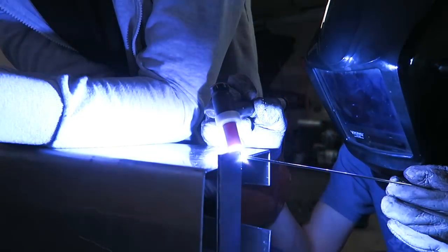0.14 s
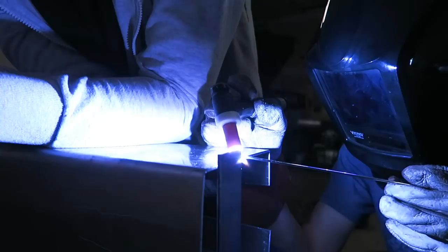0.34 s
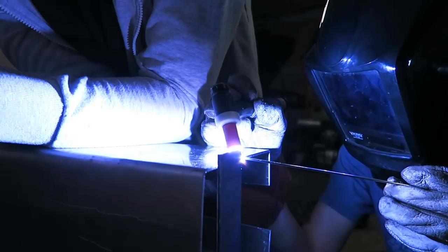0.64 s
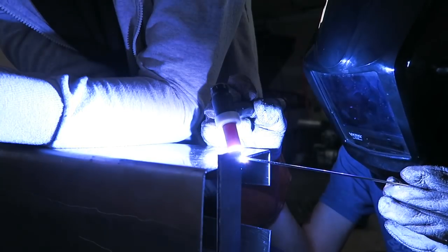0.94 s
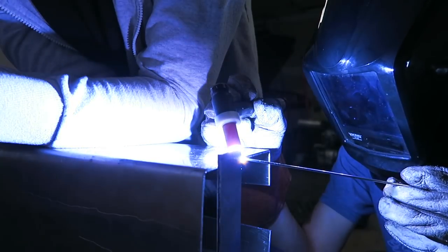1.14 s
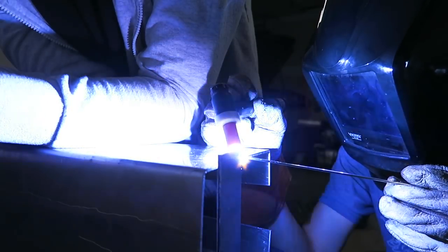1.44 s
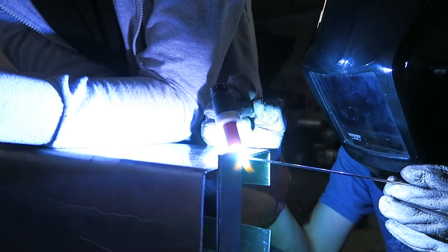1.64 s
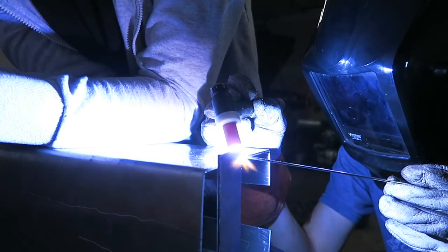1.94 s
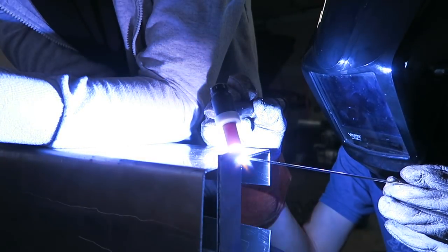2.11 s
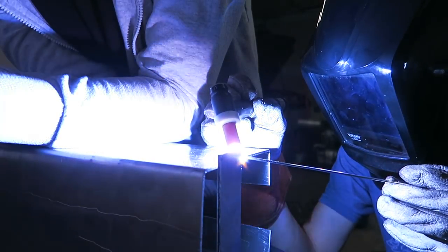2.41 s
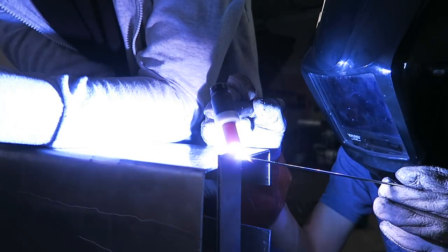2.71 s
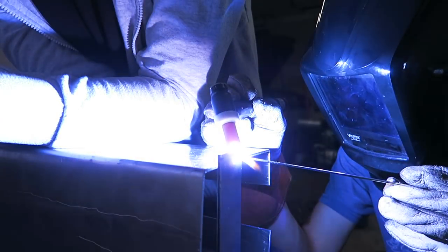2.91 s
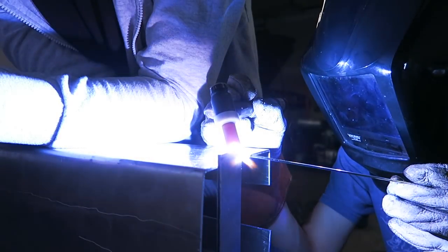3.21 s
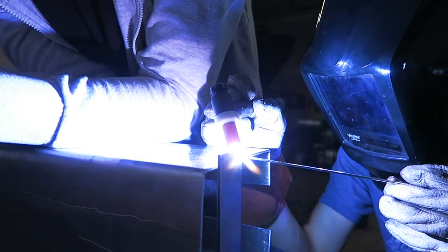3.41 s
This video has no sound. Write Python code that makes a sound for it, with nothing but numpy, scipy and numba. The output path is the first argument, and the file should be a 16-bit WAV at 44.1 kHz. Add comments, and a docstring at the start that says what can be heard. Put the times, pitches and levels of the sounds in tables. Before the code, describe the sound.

A welding arc buzzes on metal close to a stereo microphone, nasal for an instant, then brighter and fuller, with constant sizzle, uneven snaps and clusters of low pops from about one second.

```python
"""An AC TIG arc buzzes on metal close to a stereo microphone for about three and a half seconds.
It opens nasal, with one strike per current cycle; after 0.115 s there are two, one per polarity, and torch and
workpiece ring with every strike. Noise gated by the strikes sizzles, and uneven strikes snap in the upper middle.
Small pops flurry around larger ones, which begin at 0.4 s: at arc misfires low pops, probably electrical
interference in the microphone, differ left and right; from 2.53 s they lose their bass.
The recorder's gain control ducks on the loudest peaks and creeps back."""
import sys
import numpy as np
from scipy import signal
from scipy.fft import rfft, irfft, next_fast_len
from scipy.io import wavfile
from scipy.ndimage import uniform_filter1d
from numba import njit

SR = 44100
rng = np.random.default_rng(int(sys.argv[2]) if len(sys.argv) > 2 else 0)


def persist_wave(psi):
    """Save psi, clipped to +-1, as 16-bit WAV."""
    counts = np.round(np.clip(psi, -1, 1) * 32767).astype(np.int16)
    wavfile.write(sys.argv[1], SR, np.atleast_2d(counts).T)


N = 156555  # samples

ARC_HZ, FIRST_STRIKE_S = 130.062, .00145
REVERSAL_S = .002397  # from the first strike of a cycle to the second
JITTER_S = 2.5e-6  # typical timing error of a strike
TOP_HZ = 15600


def undb(db):
    """Turn dB into an amplitude factor."""
    return 10 ** (np.asarray(db) / 20)


def unit(x):
    """Scale to rms 1."""
    return x / np.sqrt(np.mean(x ** 2))


def clock():
    """Time of every sample in seconds."""
    return np.arange(N) / SR


def curve(table, axis=1):
    """Gain over time from a dB column, straight in dB between the rows."""
    table = np.array(table, float)
    return undb(np.interp(clock(), table[:, 0], table[:, axis]))


def colour(x, points, size=4096):
    """Causal minimum-phase filter through (Hz, dB) points."""
    hz, db = np.array(sorted(map(tuple, points)), float).T
    f = np.maximum(np.fft.rfftfreq(size, 1 / SR), 1)
    log_gain = np.log(undb(np.interp(np.log(f), np.log(hz), db)))
    # folding the cepstrum onto positive time makes the response causal
    cepstrum = irfft(log_gain)
    cepstrum[1:size // 2] *= 2
    cepstrum[size // 2 + 1:] = 0
    response = irfft(np.exp(rfft(cepstrum)))
    return signal.fftconvolve(x, response)[:N]


def clicks(times, sizes, count=8):
    """Band-limited clicks placed between samples, each a windowed sinc."""
    at = times[:, None] * SR
    index = np.floor(at).astype(int) + np.arange(1 - count, count + 1)
    window = np.cos(np.pi * (index - at) / (2 * count)) ** 2
    taps = sizes[:, None] * np.sinc(index - at) * window
    inside = (index >= 0) & (index < N)
    return np.bincount(index[inside], taps[inside], N)


def cycle_starts():
    """Time of the first strike in every current cycle."""
    return FIRST_STRIKE_S + np.arange(int(N / SR * ARC_HZ)) / ARC_HZ


def strikes(delay, scatter_db):
    """One click per current cycle, uneven in level and slightly in time."""
    starts = cycle_starts()
    chance = np.clip(rng.standard_normal((len(starts), 2)).T, -2, 2)
    return clicks(starts + delay + JITTER_S * chance[0], undb(scatter_db * chance[1]))


def stereo(centre, side):
    """Left and right from the centre and side signals."""
    return np.array([centre + side, centre - side])


# Ring of arc, torch and workpiece. Each row: frequency in Hz, relative level in dB of the first strike
# on cold metal, of the first strike on hot metal, and of the second strike.
RING = [(174, -17.5, 5, 3), (405, -6.5, 7.5, -9.5), (704, -5.5, 10.5, 12), (912, -11, -4.5, -16.5),
        (1184, 9.5, 7.5, 5.5), (1608, 0, 14.5, 14.5), (1990, -2, -9.5, 4.5), (2210, 3.5, 16, -12),
        (2565, -36, -7.5, -9.5), (2716, -42, 23, 19.5), (3053, 22.5, 17, 23), (3520, 19, -3.5, 15),
        (4500, 7.5, 5.5, -9.5), (4770, -1, -12, -3), (6400, -7.5, -32, -7.5), (7010, 8, 10.5, 5),
        (7290, -11, -4.5, -20.5), (9140, -4, -21, -13), (9880, -3, 6, 8), (10930, -6.5, 13.5, 6.5),
        (11400, 5.5, -2.5, -1), (11500, -13, -23, -12), (12500, 7, -6, -11), (12900, -8, -24, -20),
        (13140, 4.5, -2, 7), (15900, -4.5, -20, -28)]
# Nasal tint before the arc settles. Each row: frequency in Hz, gain in dB.
UNSETTLED = [(300, -6), (620, 11.5), (1200, -9), (1750, 13.5), (3000, -4.5), (3800, -1)]
HEATS_S, SETTLES_S = (0.13, 2.8), .115  # span of the cold-to-hot fade; end of the nasal start
SCATTER_DB = 1
SPREAD_HZ, SPREAD_WIDTH_HZ = 2490, 1000


def ring_of_metal():
    """The first strike's ring changes colour as the metal heats; the second joins once the arc settles."""
    table, t = np.array(RING), clock()
    click = strikes(0, SCATTER_DB)
    cold = colour(click, table[:, [0, 1]])
    hot = colour(click, table[:, [0, 2]])
    second = colour(strikes(REVERSAL_S, SCATTER_DB), table[:, [0, 3]])
    heat = np.interp(t, HEATS_S, [0, 1])
    settled = (1 - heat) * cold + heat * hot + second
    ring = np.where(t < SETTLES_S, colour(cold, UNSETTLED), settled)
    # an all-pass resonance spreads the ring in time around SPREAD_HZ
    radius = np.exp(-np.pi * SPREAD_WIDTH_HZ / SR)
    poles = np.array([1, -2 * radius * np.cos(2 * np.pi * SPREAD_HZ / SR), radius ** 2])
    return signal.lfilter(poles[::-1], poles, ring)


# Borders in Hz between the buzz's hum, middle, presence and treble.
BAND_EDGES_HZ = [455, 2450, 4600]
# The buzz as the arc builds. Each row: time in seconds, then the level in dB, before the trim BUZZ_DB,
# of hum, middle, presence and treble.
BUZZ = [(0, -36, -19, -24.5, -23), (.1, -39, -19.5, -32, -22.5), (.13, -41, -21.5, -22, -22),
        (.3, -39.5, -18.5, -18, -21.5), (.72, -41, -19.5, -15.5, -23.5), (.9, -33.5, -15, -12, -19.5),
        (1.43, -29, -17.5, -15.5, -18.5), (1.57, -33.5, -21, -17, -23), (1.9, -29.5, -15, -13.5, -16.5),
        (2.55, -24.5, -15.5, -14, -18), (3.15, -24.5, -17, -16, -20.5), (3.53, -28, -20, -17.5, -22)]
BUZZ_DB = -4.5
# Stereo width of the buzz. Each row: frequency in Hz, side against centre in dB.
BUZZ_WIDTH = [(300, -27), (900, -15), (3200, -25.5), (4500, -20), (11000, -15.5)]


def buzz():
    """Strikes repeating at the current's rate ring into a buzz; each register swells in its own way."""
    ring = ring_of_metal()
    edges = [ARC_HZ / 2] + list(BAND_EDGES_HZ) + [TOP_HZ]
    centre = 0
    for k, band_hz in enumerate(zip(edges, edges[1:])):
        sections = signal.butter(8, band_hz, "band", fs=SR, output="sos")
        band = signal.sosfiltfilt(sections, ring)
        # even out the level over ten cycles, so the table alone sets it
        band = band / np.sqrt(uniform_filter1d(band ** 2, int(10 * SR / ARC_HZ)))
        centre = centre + undb(BUZZ_DB) * band * curve(BUZZ, axis=k + 1)
    quarter_turn = signal.hilbert(centre, next_fast_len(N))[:N].imag
    return stereo(centre, colour(quarter_turn, BUZZ_WIDTH))


# Course of the sizzle, which snaps and small pops follow too. Each row: time in seconds, relative level in dB.
SIZZLE = [(0, -31), (.13, -29), (.22, -34), (.39, -26), (.485, -30.5), (.565, -24.5), (.73, -32), (.9, -25),
          (1.5, -27.5), (1.59, -32), (1.8, -23), (2.02, -25.5), (2.5, -27.5), (2.85, -27.5), (3.53, -29)]
# Colour of the sizzle and of the pops' clicks. Each row: frequency in Hz, gain in dB.
SIZZLE_COLOUR = [(40, -26), (260, -8), (910, -11), (2100, -3), (3600, -5), (5100, -12.5), (12000, -8),
                 (15600, -29)]
# Stereo width of the sizzle. Each row: frequency in Hz, side against centre in dB.
SIZZLE_WIDTH = [(300, 8), (700, 5), (1500, -6.5), (4000, -9), (8000, 0.5)]
SIZZLE_DB, SIZZLE_SCATTER_DB, SIZZLE_DECAY_S = 3, 7.5, 0.00091
SIZZLE_SECOND, SIZZLE_BETWEEN = 0.69, 1  # second strike and constant hiss, against the first strike


def sizzle():
    """A short spit of noise decays after each strike, over a constant hiss."""
    age = np.arange(int(SR / ARC_HZ)) / SR
    first = strikes(0, SIZZLE_SCATTER_DB)
    second = SIZZLE_SECOND * strikes(REVERSAL_S, SIZZLE_SCATTER_DB)
    spits = signal.fftconvolve(first + second, np.exp(-age / SIZZLE_DECAY_S))[:N]
    gate = SIZZLE_BETWEEN + spits
    centre, side = (unit(colour(gate * rng.standard_normal(N), SIZZLE_COLOUR)) for _ in range(2))
    return undb(SIZZLE_DB) * curve(SIZZLE) * stereo(centre, colour(side, SIZZLE_WIDTH))


SNAP_HZ, SNAP_DB, SNAP_SCATTER_DB = 3500, -4, 4.5  # lower band edge; level against the sizzle's course


def snaps():
    """Hard re-ignitions, one per cycle, snap unevenly in a narrow band of the upper middle."""
    band = signal.butter(2, [SNAP_HZ, SNAP_HZ * 1.151], "band", fs=SR, output="sos")
    ringing = signal.sosfilt(band, strikes(0, SNAP_SCATTER_DB))
    return undb(SNAP_DB) * curve(SIZZLE) * unit(ringing)


# The larger pops at arc misfires. Each row: start in seconds, relative level in dB of the pulse
# common to both channels, relative level in dB of the pulse opposed between left and right.
POPS = [(.401, -14.5, -8), (1.024, -18, -14), (1.063, -9, -4), (1.101, -9, -9), (1.109, -9.5, -10),
        (1.178, -7, -2), (1.202, -12.5, -6), (1.232, -9, -1), (1.333, -12, -4), (1.4, -11, -17),
        (1.409, -15, -17), (1.425, -8, -3.5), (1.433, -16, -17), (1.447, -6, -1), (1.462, -10.5, -23),
        (1.507, -9, 1), (1.685, -7, -0.5), (1.77, -9, 0.5), (1.779, -12, 1), (1.783, -11, 0),
        (1.793, -5.5, 2.5), (1.829, -5.5, -1.5), (1.862, -8.5, 0), (1.914, -7, 1.5), (1.931, -4, -2),
        (2.131, -16.5, -20), (2.231, -4.5, 5), (2.247, -3, 3.5), (2.33, -6, -3), (2.377, -4.5, -4.5),
        (2.64, -20, -1.5), (2.646, -5.5, -5), (2.74, -12, -20), (2.809, -12, -1.5), (2.839, -9, -6.5),
        (3.162, -15.5, -15), (3.216, -7.5, 2.5), (3.269, -14, -2), (3.332, -14, -3), (3.401, -12, -9),
        (3.431, -13, -4), (3.54, -11.5, -5)]
CLICK_DB = 15  # against the common pulse's level


def pop_clicks():
    """Every larger pop starts with a click in the colour of the sizzle."""
    times, centre_db, _ = np.array(POPS, float).T
    return -colour(clicks(times, undb(centre_db + CLICK_DB)), SIZZLE_COLOUR)


POP_WIDTH_S, POP_SIDE_HZ, POP_SIDE_DECAY_S = 0.0005, 308, 0.0015
POP_LOW_HZ, POP_LOW_DECAY_S, POP_LOW_SHARE = 54, .006, .65
SMALL_POP_DB, SMALL_POP_SCATTER_DB = -13, 8  # against the sizzle's course
FLURRY_DB, RESTLESS_S = 15.5, .04  # boost of small pops at a big one, and its reach
POPS_THIN_S, POP_BASS_HZ = (2.53, 3.03), 93  # over this span the pops lose their bass


def misfire_pops(size=2048):
    """At arc misfires low pops, probably electrical interference in the microphone, differ left and right.
    Small ones of random size fall on the strikes, louder with the sizzle and in flurries around the big ones."""
    times, centre_db, side_db = np.array(POPS, float).T
    age, starts = np.arange(size) / SR, cycle_starts()
    pulse = age / POP_WIDTH_S * np.exp(1 - age / POP_WIDTH_S)
    low_tail = np.sin(2 * np.pi * POP_LOW_HZ * age) * np.exp(-age / POP_LOW_DECAY_S)
    common = pulse - POP_LOW_SHARE * low_tail
    opposed = np.sin(2 * np.pi * POP_SIDE_HZ * age) * np.exp(-(age / (2 * POP_SIDE_DECAY_S)) ** 2)

    nearness = np.exp(-abs(starts[:, None] - times).min(1) / RESTLESS_S)
    restless = undb(FLURRY_DB * np.interp(clock(), starts, nearness))

    def play(db, shape):
        """Give small and big pops random signs and one shape."""
        chance = np.clip(rng.standard_normal(len(starts)), -2, 2)
        small = undb(SMALL_POP_DB + SMALL_POP_SCATTER_DB * chance) * rng.choice([-1, 1], len(starts))
        small_hits = restless * curve(SIZZLE) * clicks(starts, small)
        big_hits = clicks(times, undb(db) * rng.choice([-1, 1], len(times)))
        return signal.fftconvolve(small_hits + big_hits, shape)[:N]

    centre = play(centre_db, common)
    bass = signal.sosfiltfilt(signal.butter(2, POP_BASS_HZ, fs=SR, output="sos"), centre)
    thinned = centre - bass * np.interp(clock(), POPS_THIN_S, [0, 1])
    return stereo(thinned, play(side_db, opposed))


def scene():
    """The arc close to the microphone: buzz, sizzle, snaps, and misfire pops with their clicks."""
    return buzz() + sizzle() + snaps() + pop_clicks() + misfire_pops()


@njit
def ride(peak, threshold, attack, release):
    """Gain falls while the output is over the threshold and climbs back at a steady rate."""
    gain, db = np.empty(len(peak)), 0.
    for i in range(len(peak)):
        gain[i] = 10 ** (db / 20)
        overshoot = max(peak[i] * gain[i] - threshold, 0.)
        db = min(0., db + (release - attack * overshoot) / SR)
    return gain


GAIN_THRESHOLD, CEILING = 0.32, .88  # of full scale
GAIN_ATTACK_DB_PER_S, GAIN_RELEASE_DB_PER_S = 13000, 17.5  # attack per unit of overshoot


def record(dry):
    """Automatic gain control, a soft ceiling on the peaks that slip past it, then the top is cut."""
    peak = np.abs(dry).max(0)  # the louder channel rules both
    gain = ride(peak, float(GAIN_THRESHOLD), float(GAIN_ATTACK_DB_PER_S), float(GAIN_RELEASE_DB_PER_S))
    ridden = dry * gain
    held = ridden / (1 + (ridden / CEILING) ** 4) ** (1 / 4)
    return signal.sosfilt(signal.ellip(10, .2, 80, TOP_HZ, fs=SR, output="sos"), held)


dry = scene()
out = record(dry)
persist_wave(out)
```